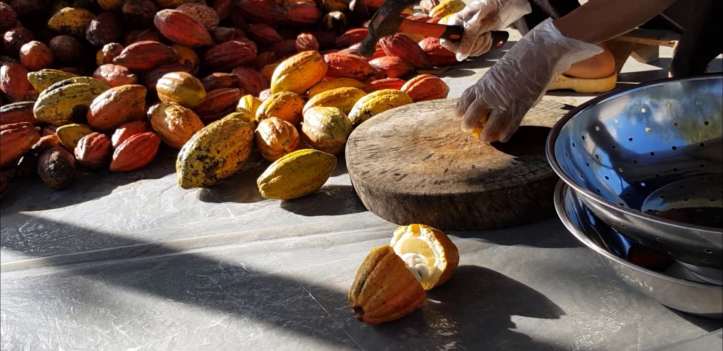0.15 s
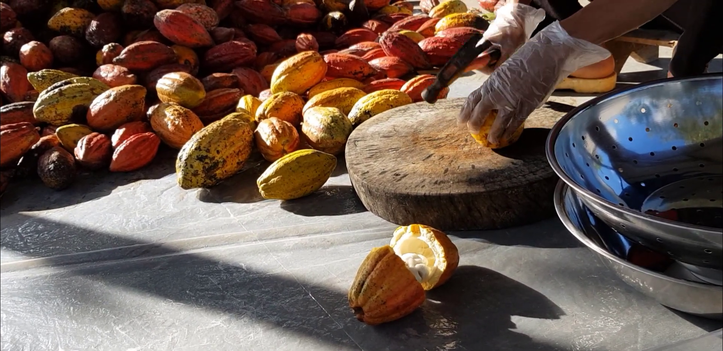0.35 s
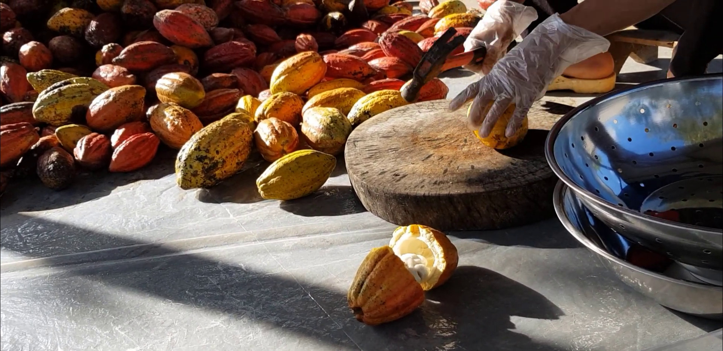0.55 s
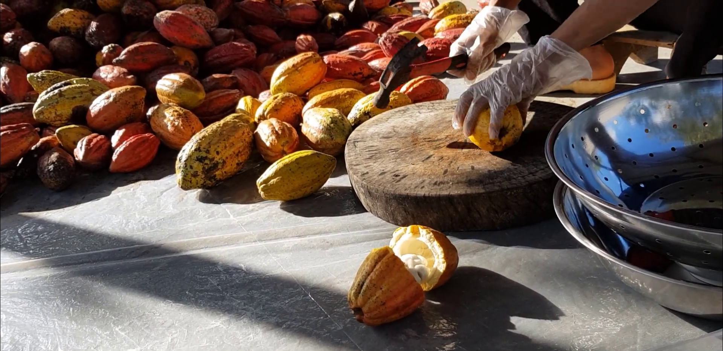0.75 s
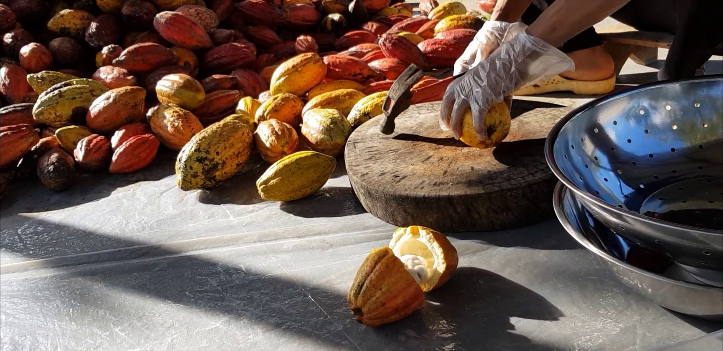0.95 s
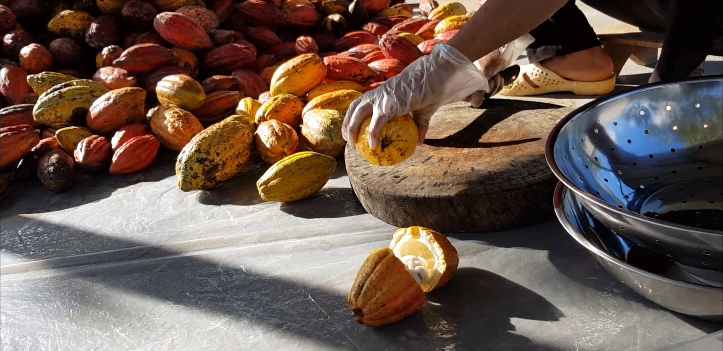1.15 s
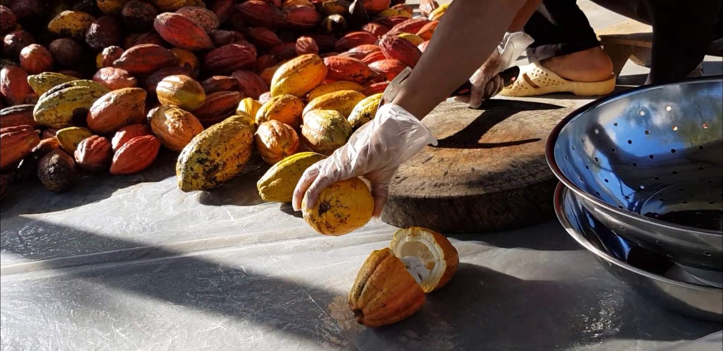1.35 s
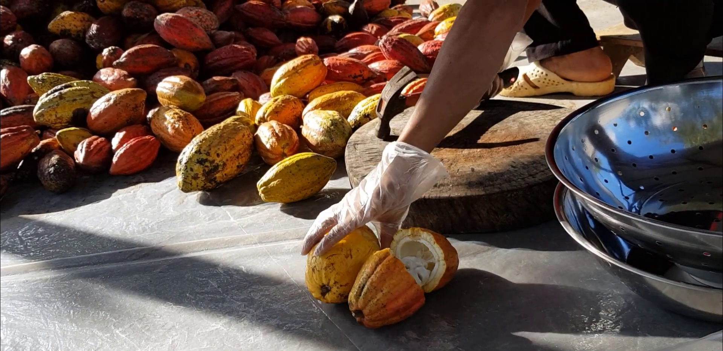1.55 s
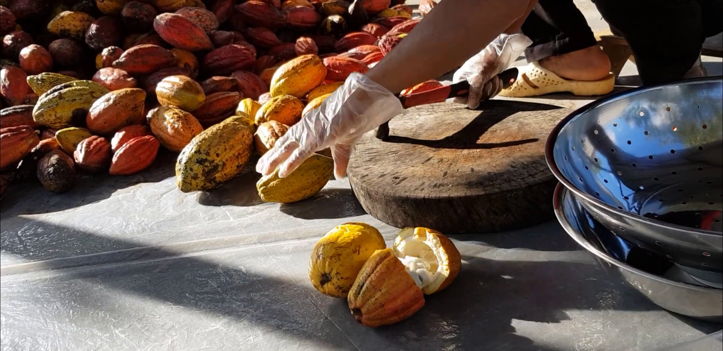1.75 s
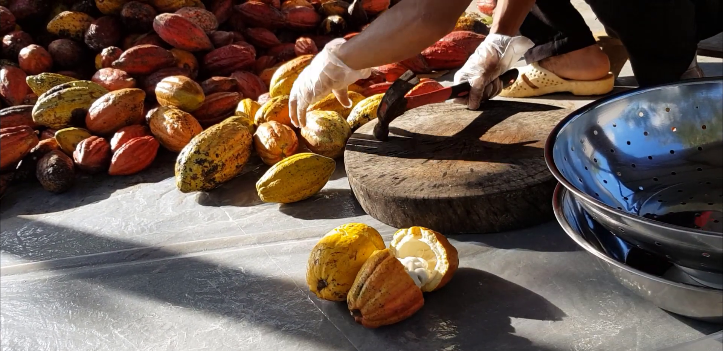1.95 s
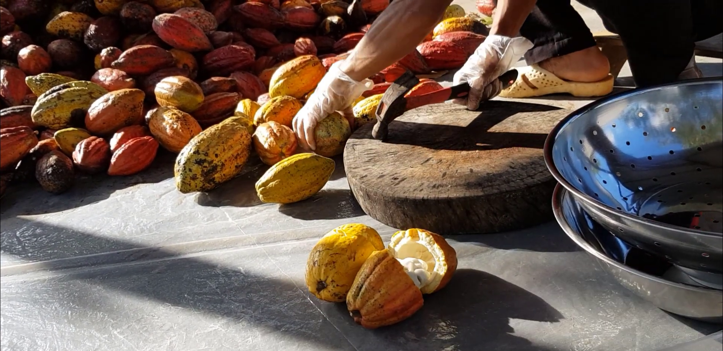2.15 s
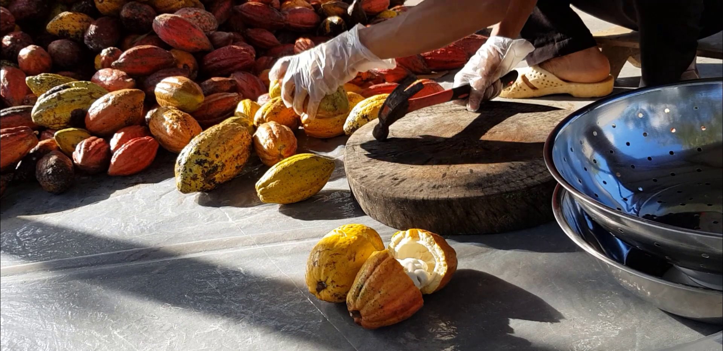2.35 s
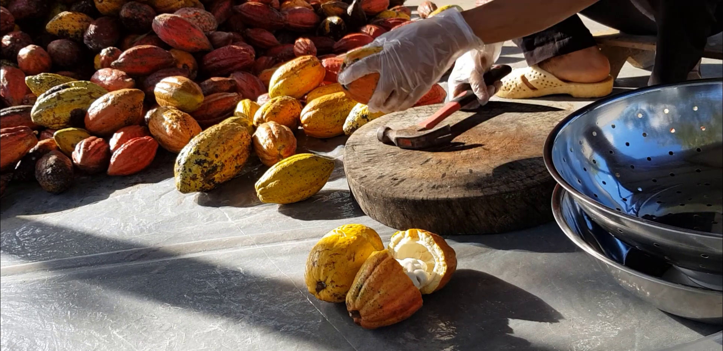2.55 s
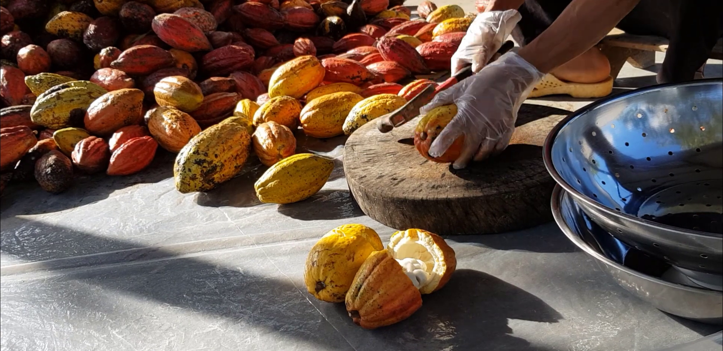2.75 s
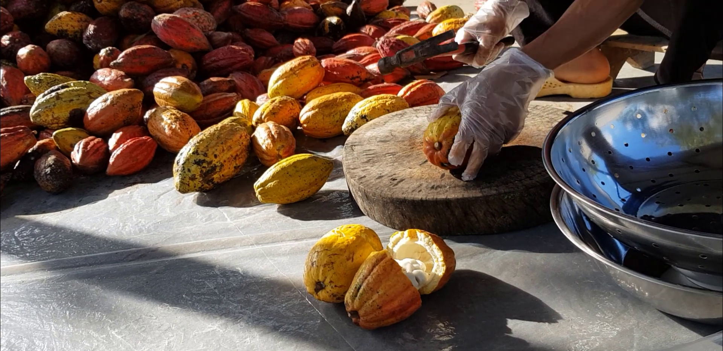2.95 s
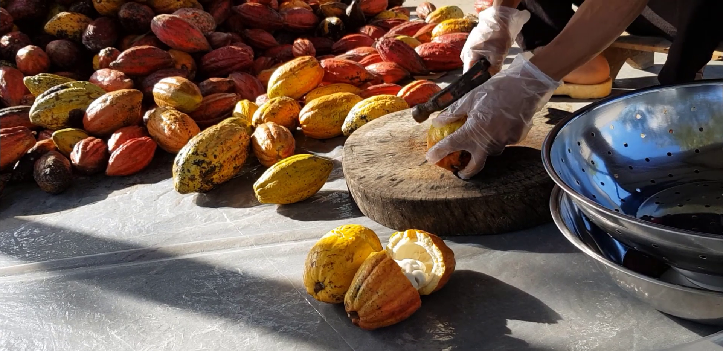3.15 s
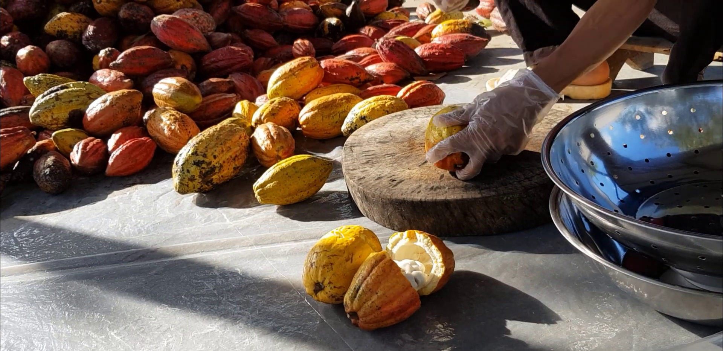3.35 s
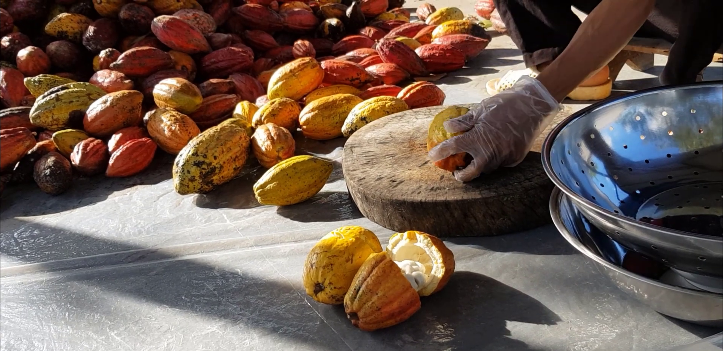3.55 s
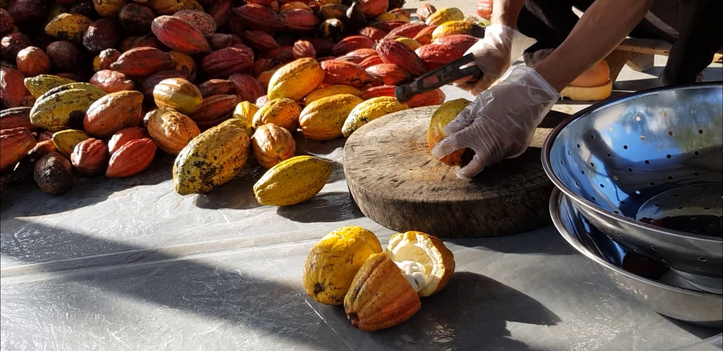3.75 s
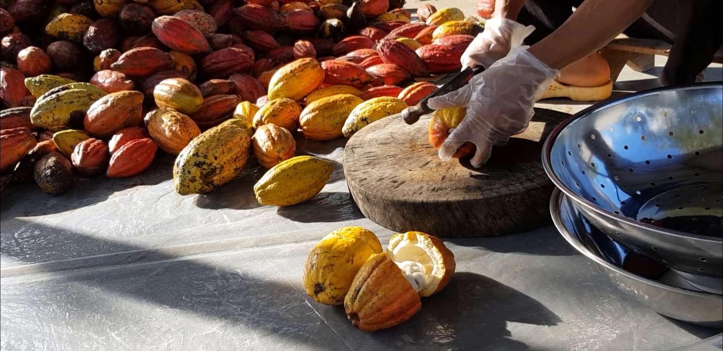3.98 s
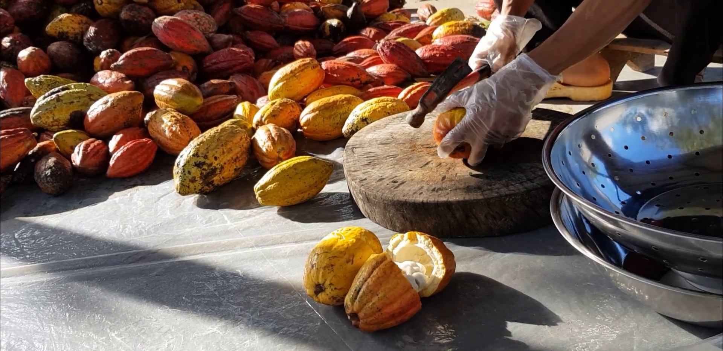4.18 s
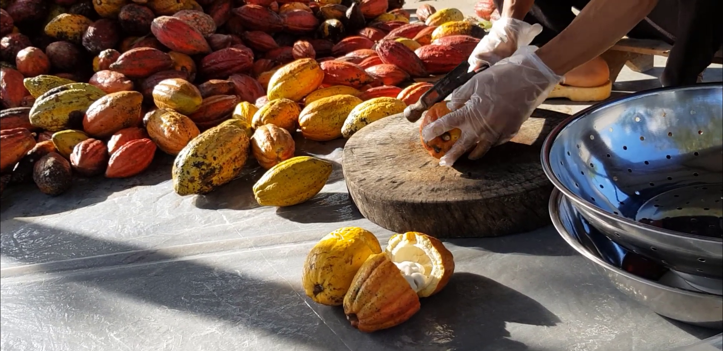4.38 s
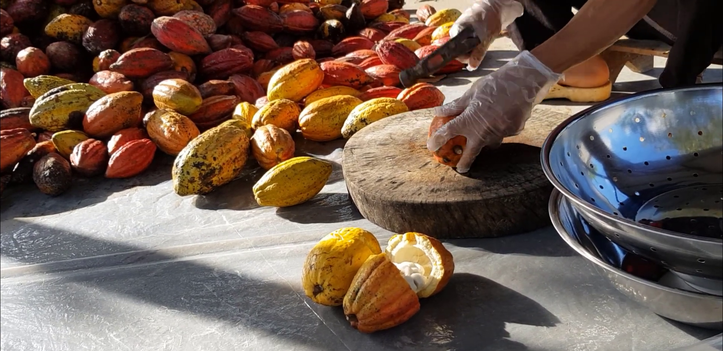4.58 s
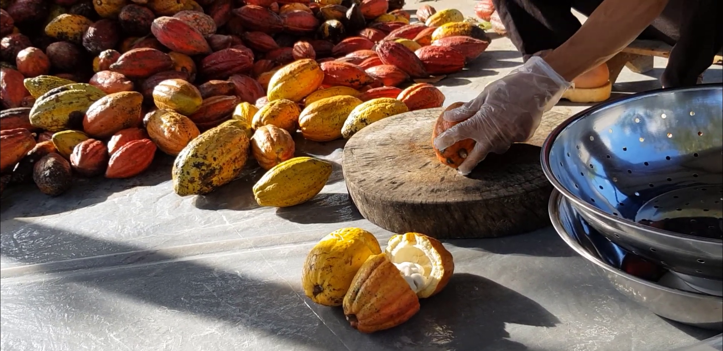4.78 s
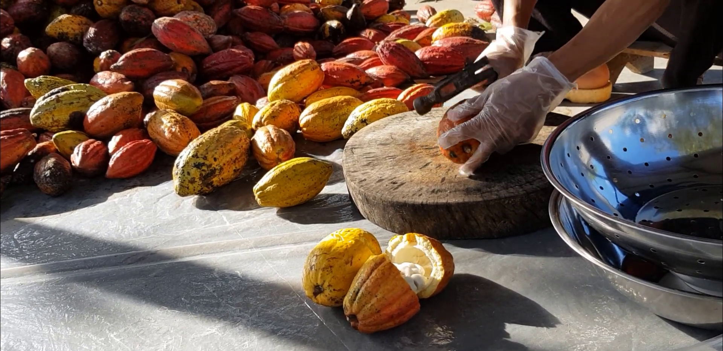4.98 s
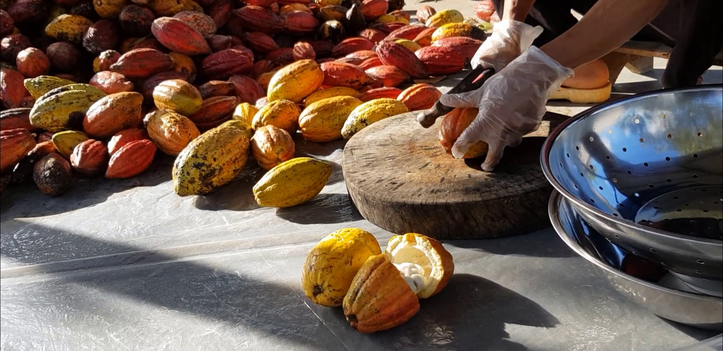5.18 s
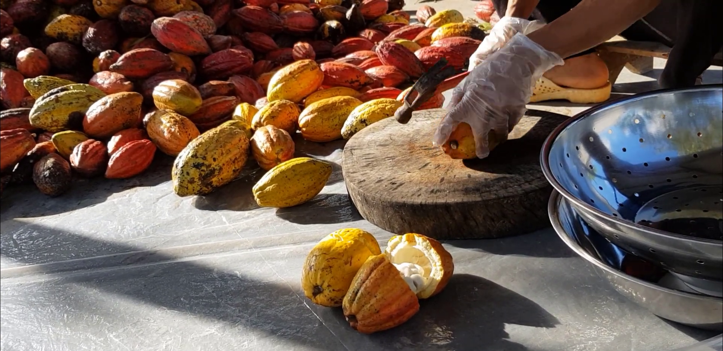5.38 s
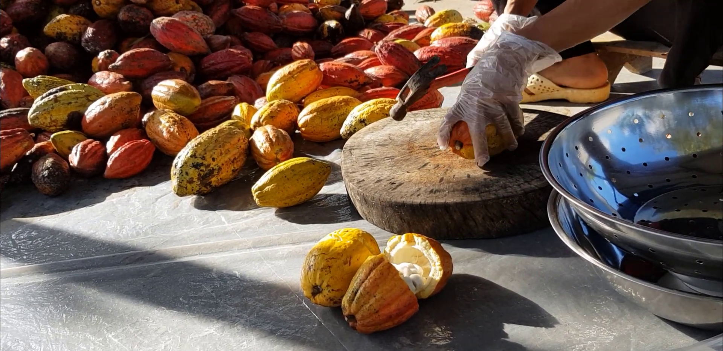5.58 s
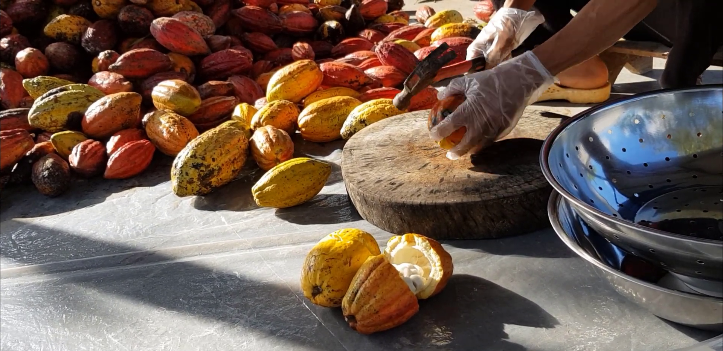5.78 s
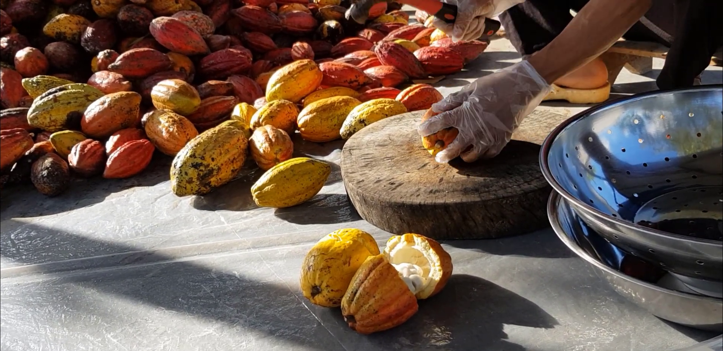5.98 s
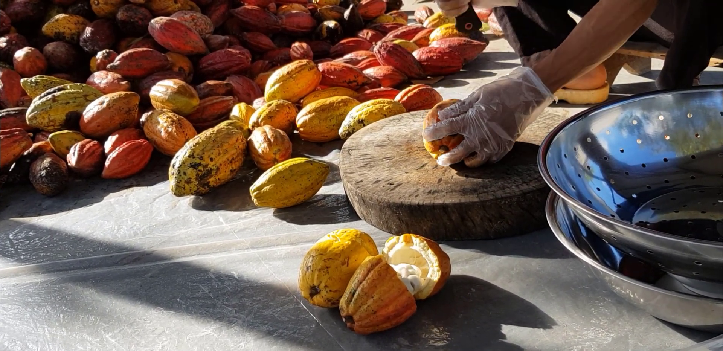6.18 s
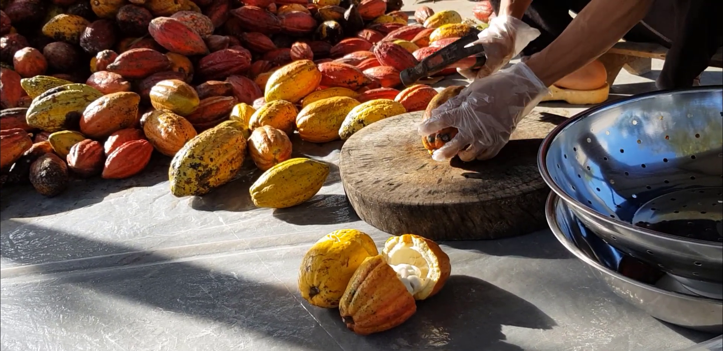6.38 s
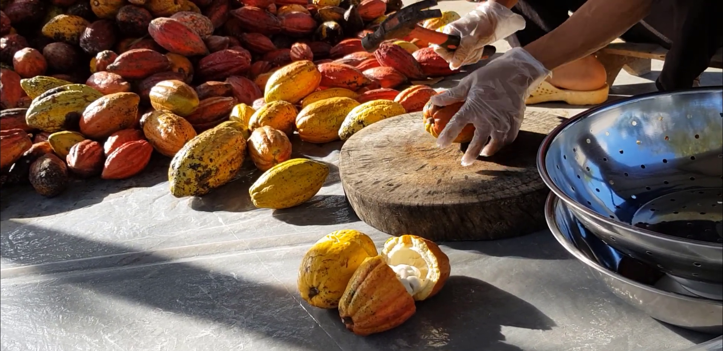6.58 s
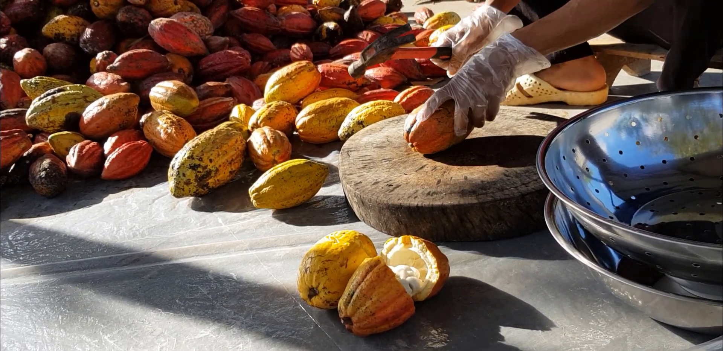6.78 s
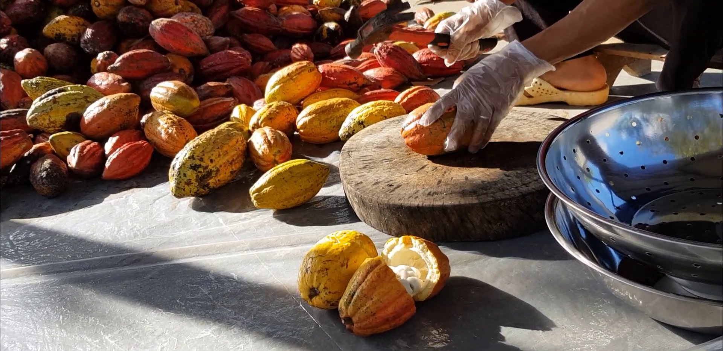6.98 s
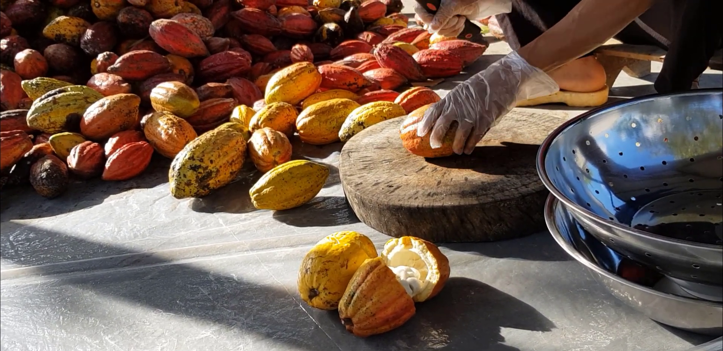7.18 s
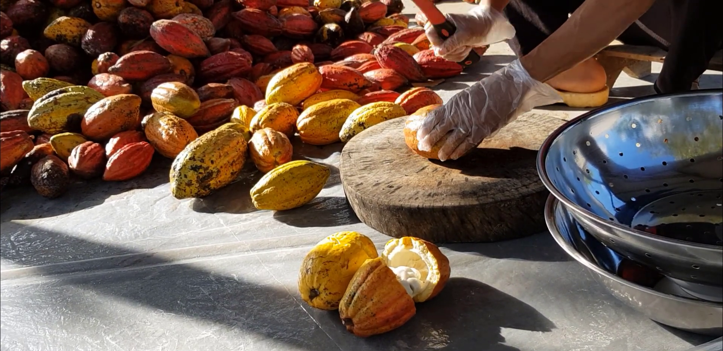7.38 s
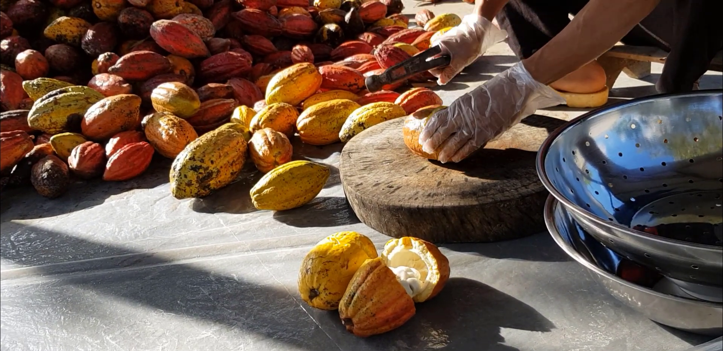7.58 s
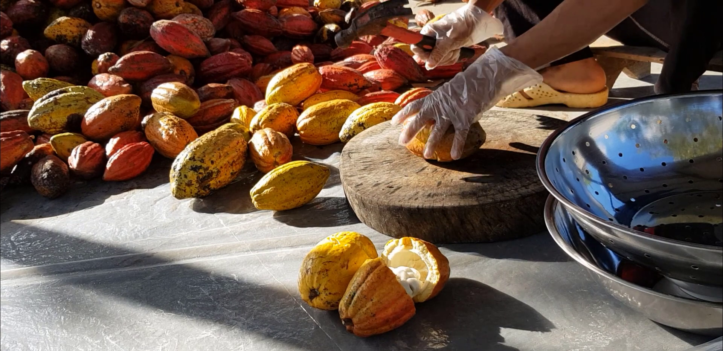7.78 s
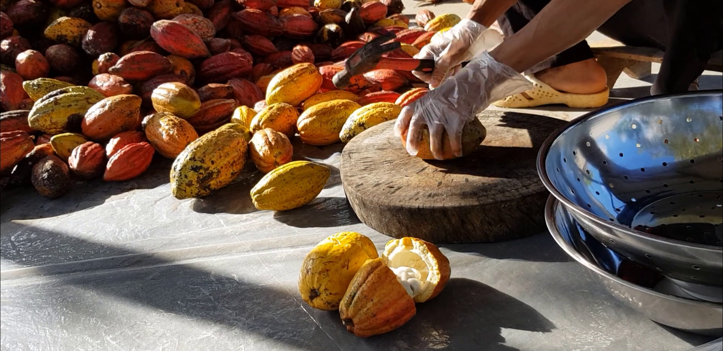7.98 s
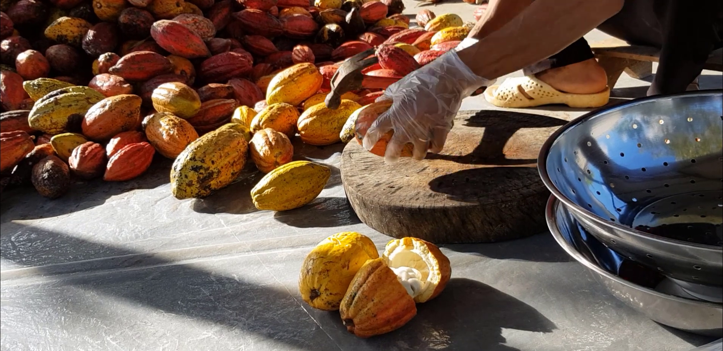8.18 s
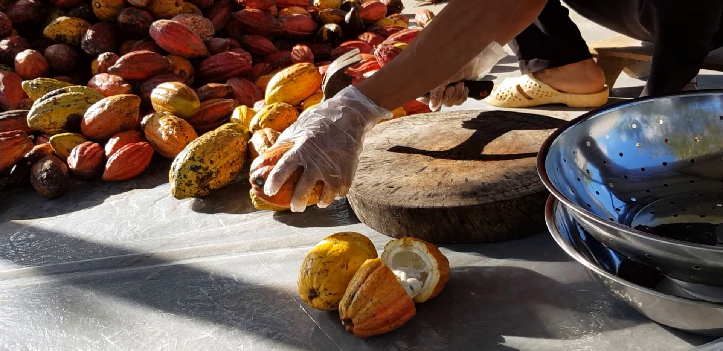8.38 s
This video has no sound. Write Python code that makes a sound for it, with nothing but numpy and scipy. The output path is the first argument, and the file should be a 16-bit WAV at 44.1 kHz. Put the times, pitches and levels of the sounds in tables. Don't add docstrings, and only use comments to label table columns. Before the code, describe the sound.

A hammer cracks hollow cacao pods on a thick wooden block, four sharp woody knocks between plastic glove crinkles, with faint low traffic behind.

```python
import sys
import numpy as np
from scipy import signal
from scipy.fft import rfft, irfft
from scipy.io import wavfile
from scipy.ndimage import uniform_filter1d

SR = 44100
rng = np.random.default_rng(int(sys.argv[2]) if len(sys.argv) > 2 else 0)


def persist_wave(psi):
    counts = np.round(np.clip(psi, -1, 1) * 32767).astype(np.int16)
    wavfile.write(sys.argv[1], SR, np.atleast_2d(counts).T)


def undo_db(level):
    steps = np.asarray(level, float) / 20
    return 10 ** steps


N = 371763
NOW = np.arange(N) / SR
T = np.arange(int(.7 * SR)) / SR

# start_s, bowl_shiver_db, ground_rumble_db, far_echo_db
SHIVERS = [
    (2.64, -64, -58, -52),
    (3.18, -64, -47.5, -64.5),
    (3.79, -45.5, -42, -52),
    (5.045, -47, -45, -54.5),
    (6.385, -52.5, -45.5, -54.5),
    (7.535, -53, -45.5, -55.5),
]
FAR_T60_S = 1.3


def on_log(hz, table, column=1):
    table = np.array(table)
    return np.interp(np.log(hz + 1), np.log(table[:, 0]), table[:, column])


def colour(x, table):
    hz = np.fft.rfftfreq(x.shape[-1], 1 / SR)
    return irfft(rfft(x) * undo_db(on_log(hz, table)), x.shape[-1])


def band(x, lo_hz, hi_hz):
    return signal.sosfilt(signal.butter(2, [lo_hz, hi_hz], "band", fs=SR, output="sos"), x)


def walk(rate_hz):
    k = int(SR / rate_hz)
    steps = np.repeat(rng.standard_normal(N // k + 1), k)
    return 0.9 * uniform_filter1d(steps, k)[:N]


def fade(t60_s):
    return np.exp(-np.log(1000) * T / t60_s)


def held(s, length_s, attack_s, release_s):
    rise = (NOW - s) / attack_s
    fall = (s + length_s - NOW) / release_s
    return np.exp(np.minimum(0, np.minimum(rise, fall)))


def peak(x, db):
    return x * undo_db(db) / np.abs(x).max()


def burst(x, db):
    return x * undo_db(db) / np.sqrt(uniform_filter1d(x ** 2, size=150).max())


def add(track, s, sound):
    i = int(s * SR)
    track[i:i + len(sound)] += sound[:len(track) - i]


def ring(modes, scatter_db=0.):
    total = 0
    for hz, db, t60_s in modes:
        strength = undo_db(db + scatter_db * rng.standard_normal())
        total = total + strength * fade(t60_s) * np.sin(2 * np.pi * hz * T)
    return total


def wooden_block(push, pod_hz):
    # pitch_hz, level_db, t60_s
    block_modes = [(332.5, -10.5, .1), (372, -2.5, 0.11), (453.4, 0.5, 0.15), (554, -9.5, .08),
                   (784, -2.5, 0.17), (886, -2, 0.2), (923, -11.5, 0.091), (1055, -4, 0.05),
                   (1100, -10, .09), (1175, -1.5, .11), (1540, 0, .09)]
    modes = band(ring(block_modes, scatter_db=8.0), 150, pod_hz * 1.39)
    modes = band(modes, 100, pod_hz * 1.5)
    return (1 - fade(0.0059)) * signal.fftconvolve(push, modes)[:len(T)]


def floor_slab():
    # pitch_hz, level_db, t60_s
    slab_modes = [(71.6, -7.5, 0.23), (100.4, -15, .2), (121, 0.5, 0.084), (133, -4.5, 0.28),
                  (160.6, 2, 0.15), (203.4, 5, 0.068), (232.2, -4, 0.048)]
    late_s = .006
    thud = (1 - fade(0.0037)) * ring(slab_modes)
    return np.roll(thud, int(late_s * SR)) * (T > late_s)


def husk(crack_db):
    tear = (1 - fade(0.023)) * (fade(0.025) + 0.11 * fade(0.23))
    fibres = rng.standard_normal((2, len(T))) * rng.exponential(size=(2, len(T))) ** .8
    snapping, loose = tear * fibres
    crack = band(snapping, 2500, 9000) + .5 * band(snapping, 9000, 16000)
    rattle = band(band(loose, 1100, 2400), 850, 5700)
    return burst(crack, crack_db - 0.5) + burst(rattle, crack_db - 7.5)


def pulp_body(pod_hz):
    noise = (1 - fade(0.014)) * fade(0.17) * rng.standard_normal(len(T))
    body = band(noise, pod_hz * 0.36, pod_hz * 1.05)
    return burst(band(body, pod_hz * 0.25, pod_hz * 1.2), -15.5)


def knock(pod_hz, thud_db, crack_db):
    cycles = T * pod_hz
    phase = 2 * np.pi * (cycles + 0.49 * np.tanh(2.5 * cycles))
    pod = -cycles ** 2 * np.exp(-cycles / .55) * np.sin(phase)
    push = np.sin(np.pi * np.minimum(cycles[:300] / .75, 1)) ** 2
    wood = peak(wooden_block(push, pod_hz), -3.0)
    thud = peak(floor_slab(), thud_db + 6.0)
    return peak(pod, 0.1) + wood + thud + husk(crack_db) + pulp_body(pod_hz)


def swelling_hiss(db):
    hiss = band(rng.standard_normal(len(T)), 500, 14000) * fade(0.021)
    return burst(hiss[::-1], db - 34)


def pod_knocks():
    # start_s, peak_db, pod_note_hz, floor_thud_db, husk_crack_db
    blows = [
        (3.784, -10, 810, -9.5, -7),
        (5.037, -10.5, 775, -8.5, -9),
        (6.379, -10, 670, -9, -12),
        (7.527, -8, 533, -16, -14),
    ]
    # start_s, peak_db, pod_note_hz, floor_thud_db, husk_crack_db
    taps = [(0.46, -26.5, 610, -8, -12.5), (0.532, -33.5, 327, -8.5, -24), (1.057, -28.5, 418, -13, -45),
            (1.587, -40, 530, -10.5, -5.5), (3.167, -30, 533, 3, -26), (3.185, -30.5, 470, -10, -19),
            (3.795, -12, 510, -14.5, -10), (5.911, -43, 360, -14, -8), (6.478, -36.5, 350, -6, -14),
            (8.138, -43.5, 351, -22, -31), (8.188, -60, 356, -11.5, -26)]
    track = np.zeros(N)
    for s, db, *feel in blows + taps:
        add(track, s, undo_db(db - 0.5) * knock(*feel))
    for s, db, *_ in blows:
        add(track, s - len(T) / SR, swelling_hiss(db))
    return track


def hammer_drop():
    # start_s, peak_db
    drops = [
        (2.632, -5.5),
    ]
    # pitch_hz, level_db, t60_s
    handle_modes = [(470, -6.5, 0.022), (562, 7, 0.017), (805, -7.5, 0.056), (1420, -10.5, 0.12),
                    (1466, -2.5, .06), (1487, -14, 0.11), (1590, 3.5, 0.02), (2430, -25, 0.17),
                    (2100, -13, .03), (3080, -12, .015)]
    track = np.zeros(N)
    for s, db in drops:
        add(track, s - len(T) / SR, swelling_hiss(db))
        handle = -np.minimum(T / 0.0021, 1) * ring(handle_modes)
        add(track, s, peak(handle, db + 0.5))
        add(track, s, undo_db(db - 9) * knock(640, -17.5, -21.5))
    return track


def steel_bowl():
    # pitch_hz, level_db, t60_s
    bowl_modes = [(868, -4, .75), (875, -6, .6), (1190, -12, .7), (1290, -10.5, .5)]
    track = np.zeros(N)
    for s, db, *_ in SHIVERS:
        add(track, s, peak(ring(bowl_modes), db))
    return track


def body_bumps():
    # start_s, peak_db, pitch_hz
    bumps = [(2.841, -40.5, 125), (2.949, -42, 80.7), (3.243, -39.5, 121), (4.45, -44.5, 80.7),
             (4.747, -42, 80.7), (6.538, -55, 80.7), (7.699, -49, 80.7)]
    track = np.zeros(N)
    for s, db, hz in bumps:
        bump = (1 - fade(0.031)) * ring([(hz, 0, .12)])
        add(track, s, peak(bump, db - 2.0))
    return track


def ports(near, stray):
    # pitch_hz, left_right_likeness (0 to 1)
    likeness = [(60, 1), (300, 0.85), (700, 0.94), (1500, 0.45), (4000, 0.26), (12000, 0.26)]
    alike = np.clip(on_log(np.fft.rfftfreq(len(near), 1 / SR), likeness), 0, 1)
    mid = rfft(near) * np.sqrt((1 + alike) / 2)
    side = rfft(stray) * np.sqrt((1 - alike) / 2)
    return irfft(np.array([mid + side, mid - side]), len(near))


def shelter():
    # delay_s, level_db
    echoes = [(.0068, -13), (.0112, -12), (.016, -15), (.021, -16)]
    # pitch_hz, t60_s, level_db
    tail_bands = [(125.7, 0.56, -2.5), (250, 0.3, -1), (500, 0.23, 1), (1000, .23, 7.5), (2000, 0.05, 0),
                  (4200, 0.17, 0), (8060, 0.14, -7.5)]
    noise, tail = rng.standard_normal((2, len(T))), 0
    for hz in 125 * 2. ** np.arange(7):
        gain = undo_db(on_log(hz, tail_bands, column=2)) * fade(on_log(hz, tail_bands))
        tail = tail + gain * band(noise, hz / 2 ** .5, hz * 2 ** .5)
    early = np.zeros((2, len(T)))
    for k, (s, db) in enumerate(echoes):
        early[0, int(s * SR) + 16 * (k % 2)] = undo_db(db)
        early[1, int(s * SR) + 22 * (1 - k % 2)] = undo_db(db)
    response = band(early, 40, 2500) + undo_db(-33) * np.minimum(T / .006, 1) * ports(*tail)
    response[:, 0] += 1
    ground = np.zeros_like(response)
    ground[[0, 1], [23, 52]] = undo_db(-20), -undo_db(-8.5)
    return response + band(ground, 900, 15000)


def work():
    struck = pod_knocks() + hammer_drop() + steel_bowl() + body_bumps()
    return signal.fftconvolve(struck[None], shelter(), axes=1)[:, :N]


def ticks():
    # start_s, peak_db, left_minus_right_db, centre_hz
    snaps = [(0.8123, -35, -2, 9840), (1.587, -42, 2, 1100), (2.371, -47, -8, 2000), (3.168, -39, 1, 1203),
             (6.337, -39, -1, 8060), (6.606, -42.5, 15, 2200), (6.891, -42.5, 18, 1300),
             (7.979, -51, -2, 2000)]
    out = np.zeros((2, N))
    for s, db, pan_db, hz in snaps:
        snap = band(fade(24.0 / hz) * rng.standard_normal(len(T)), hz / 2, hz * 2)
        snap = peak(snap, db)
        add(out[0], s, snap * undo_db(pan_db / 2))
        add(out[1], s, snap * undo_db(-pan_db / 2))
    return out


def bed(x, lo_hz, hi_hz, db):
    pair = ports(*x)
    return pair * undo_db(db) / band(pair.mean(axis=0), lo_hz, hi_hz).std()


def power_db(parts):
    return 10 * np.log10(sum((gain * undo_db(db)) ** 2 for gain, db in parts) + 1e-12)


def linger(t60_s, column):
    parts = []
    for row in SHIVERS:
        gain = (NOW > row[0]) * held(row[0], 0, 1, t60_s / np.log(1000))
        parts.append((gain, row[column]))
    return parts


def rustle():
    # start_s, length_s, crinkle_db, drag_below_crinkle_db
    moves = [(0, 0.046, -55.5, -11), (0.138, 0.089, -61, -21), (0.51, 0.15, -60.5, -15),
             (0.695, 0.18, -53, -13), (1.086, 0.14, -59.5, -15), (1.28, 0.21, -55.5, -13.5),
             (1.533, 0.18, -53, -15), (1.78, .13, -54.5, -16), (1.986, .07, -57, -15),
             (2.078, 0.069, -44, -10), (2.226, 0.028, -50.5, -7.5), (2.36, 0.1, -53, -14.5),
             (2.469, 0.2, -49, -13), (2.787, 0.077, -49, -30), (2.915, 0.33, -51, -14.5),
             (3.401, 0.17, -55, -14.5), (3.605, 0.2, -54.5, -15.5), (3.9, 0.14, -57.5, -18),
             (4.122, 0.079, -57, -13), (4.269, 0.12, -56.5, -11.5), (4.452, 0.14, -57, -17),
             (4.852, 0.084, -65, -16), (5.157, 0.13, -57.5, -25), (5.415, 0.16, -57.5, -13.5),
             (5.611, 0.068, -54.5, -13.5), (5.808, 0.18, -55.5, -14), (6.036, 0.23, -64.5, -21),
             (6.47, 0.27, -58.5, -17), (6.779, 0.081, -53.5, -14), (6.974, 0.13, -56, -14),
             (7.129, 0.19, -51, -12), (7.378, 0.084, -61, -5.5), (7.702, 0.019, -54.5, -12),
             (7.792, 0.23, -53.5, -11), (8.085, 0.21, -71, 3.5), (8.327, 0.068, -61.5, -4.5)]
    # pitch_hz, level_db (per Hz)
    crinkle_colour = [(1180, -47.5), (2000, -13.5), (2870, -4), (3250, -5), (4240, -3.5), (6580, -2.5),
                      (7650, -0.5), (9620, -6.5), (13800, -2), (15900, -8.5), (16500, -59)]
    # pitch_hz, level_db (per Hz)
    drag_colour = [(240, -35), (400, -3), (945, 3.5), (1170, -4.5), (1610, -1.5), (1810, -2.5),
                   (3000, -22.5), (3900, -22), (6600, -120)]
    grip_s, let_go_s = 0.011, 0.062
    crinkles, drags = [], []
    for s, length_s, db, below_db in moves:
        gain = held(s, length_s, grip_s, let_go_s)
        crinkles.append((gain, db))
        drags.append((gain, db + below_db))
    crinkle_db = power_db(crinkles) + .1 + 1.5 * walk(14)
    drag_db = power_db(drags + linger(FAR_T60_S, column=3)) + .1 + 0.47 * walk(19)
    snaps = (rng.random(N) < 600 / SR) * undo_db(3.0 * np.minimum(rng.exponential(size=N), 3))
    snaps = signal.lfilter([1], [1, -.96], snaps)
    sheet = rng.standard_normal((2, N)) * (1 + .4 * snaps) * undo_db(1.2 * walk(40))
    crinkle = bed(colour(sheet, crinkle_colour), 2700, 20000, crinkle_db)
    return crinkle + bed(colour(sheet, drag_colour), 510, 2500, drag_db)


def still_air():
    # pitch_hz, level_db
    air_colour = [(240, -27), (400, -1), (618, -8), (871, -2.5), (1750, -12), (2800, -9), (3940, -6),
                  (6480, -4.5), (7570, -1), (9720, -8.5), (13300, -2.5), (15300, -9), (16500, -53)]
    hiss = colour(rng.standard_normal((2, N)), air_colour)
    return bed(hiss, 3000, 19000, -63.5 + .6 * walk(16))


def engine():
    # start_s, length_s, pitch_hz, level_db
    engine_notes = [
        (0.854, 0.666, 61.4, -41.5),
        (3.06, 1.413, 63, -41.5),
        (4.56, .24, 61.5, -49.5),
        (2.0, .7, 216.5, -62.5),
    ]
    sag_hz_per_s, swell_s, cut_s = 1.2, .04, 0.022
    tones = 0
    for s, length_s, hz, db in engine_notes:
        since = NOW - s
        tone = np.sin(2 * np.pi * (hz - sag_hz_per_s * since / 2) * since)
        tones = tones + undo_db(db) * held(s, length_s, swell_s, cut_s) * tone
    return tones


def traffic():
    # time_s, level_db
    tyres = [(0, -79.5), (2, -70), (4.1, -68), (4.9, -78), (5.6, -69), (6.2, -70), (6.7, -66), (7.4, -60.5),
             (7.8, -60.5), (8.2, -54), (8.43, -59)]
    # pitch_hz, level_db (per Hz)
    rumble_colour = [(15, -56.5), (25, -8), (32, -9.5), (48, 0.5), (70, 5.5), (101, 0.5), (140, -5.5),
                     (200, -10.5), (260, -42.5), (440, -120)]
    drone_db = np.interp(NOW, *np.transpose(tyres))
    low_db = power_db(linger(2.4, column=2) + [(1, -56.5)]) + 1.3 * walk(9)
    low = bed(colour(rng.standard_normal((2, N)), rumble_colour), 70, 160, low_db)
    upper_db = -30 + 0.51 * drone_db + 1.2 * walk(14)
    upper = bed(band(rng.standard_normal((2, N)), 170, 270), 170, 270, upper_db)
    drone = bed(band(rng.standard_normal((2, N)), 300, 390), 280, 490, drone_db - 0.5 + 1.4 * walk(35))
    return low + upper + drone


def scene():
    left, right = work() + ticks() + rustle() + still_air() + traffic() + engine()
    left_lag, left_db = 4, -2
    return np.array([np.roll(left, left_lag) * undo_db(left_db / 2), right * undo_db(-left_db / 2)])


def roll_off(x):
    return signal.sosfilt(signal.butter(12, 16640, fs=SR, output="sos"), x)


def record(dry):
    thin = signal.sosfilt(signal.butter(2, 40, "high", fs=SR, output="sos"), dry)
    dull = signal.sosfilt(signal.ellip(8, .2, 60, 16000, fs=SR, output="sos"), thin)
    return roll_off(dull)


dry = scene()
out = record(dry)
persist_wave(out)
```